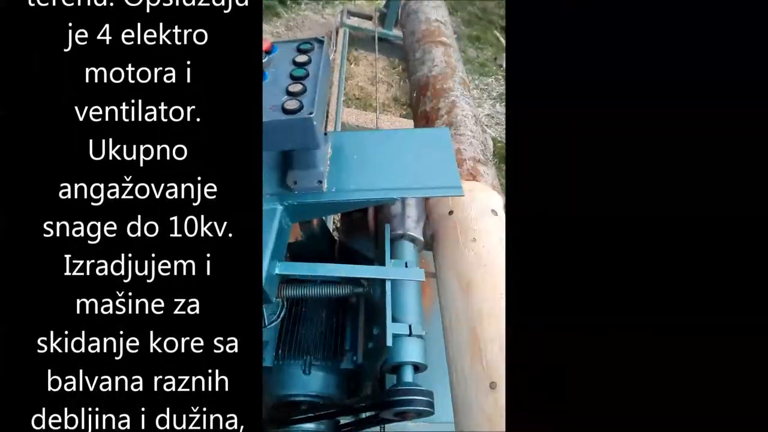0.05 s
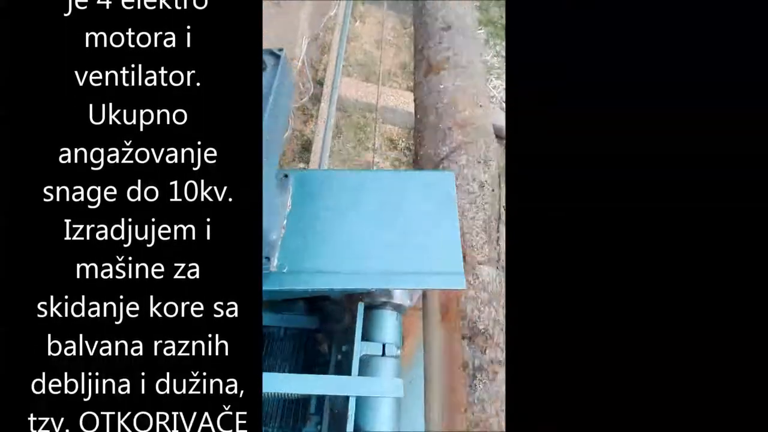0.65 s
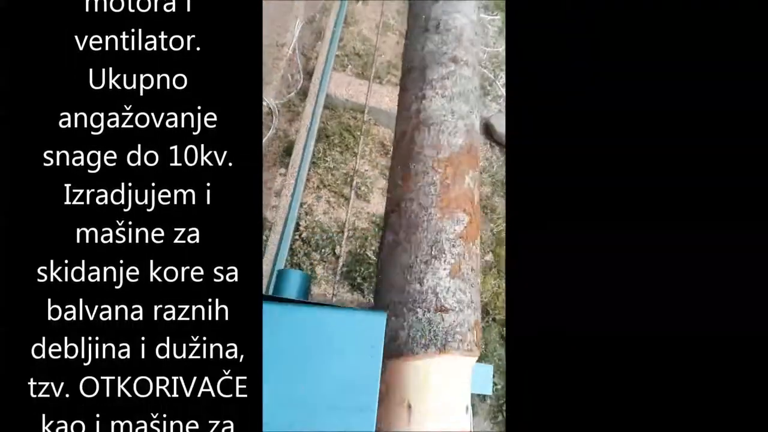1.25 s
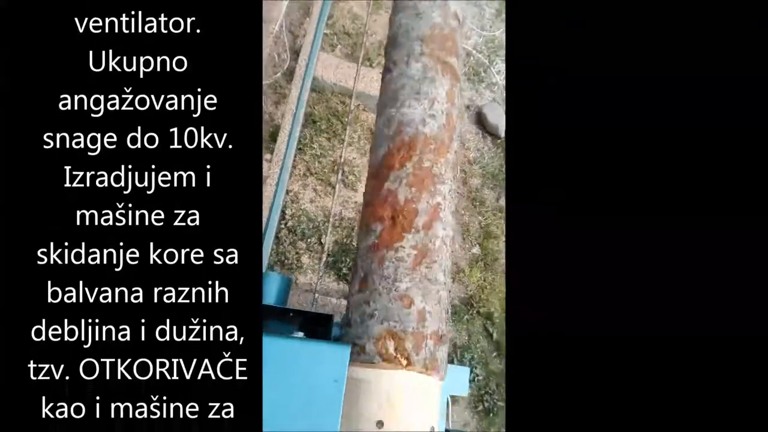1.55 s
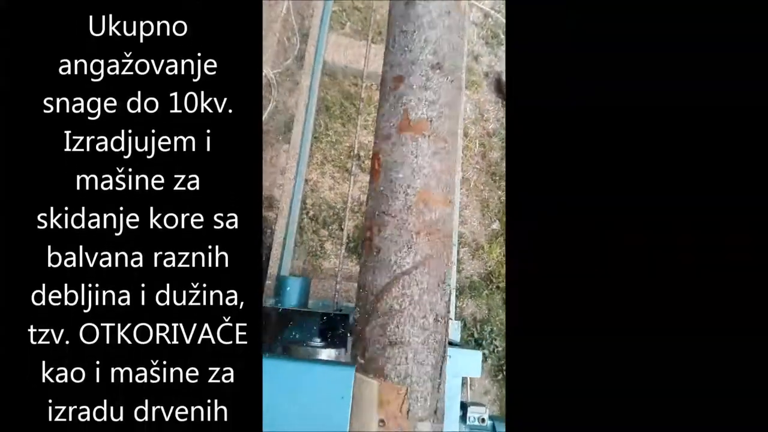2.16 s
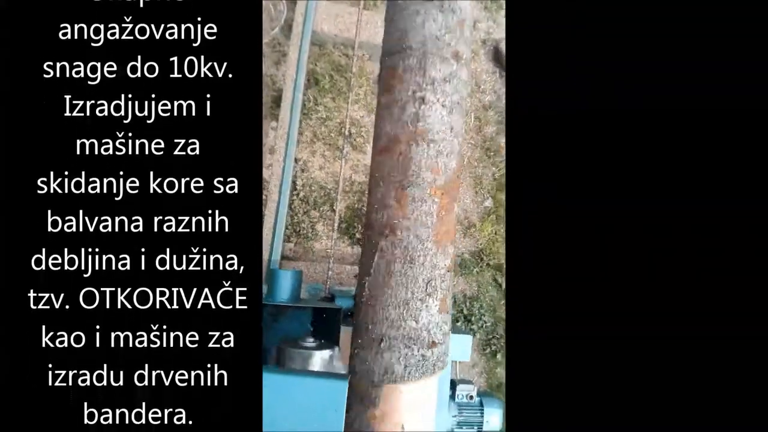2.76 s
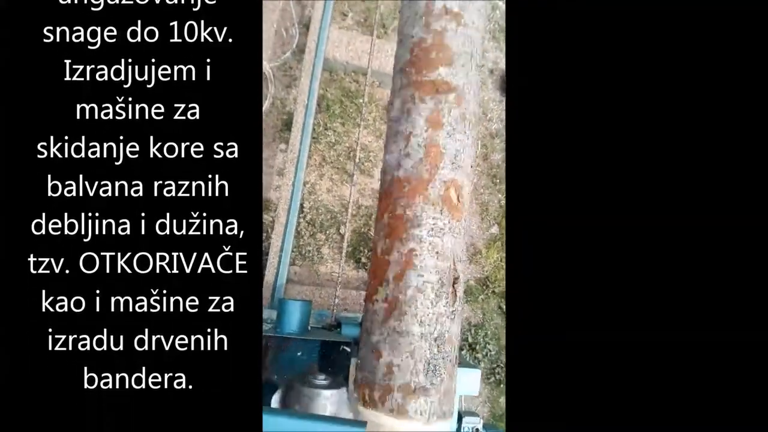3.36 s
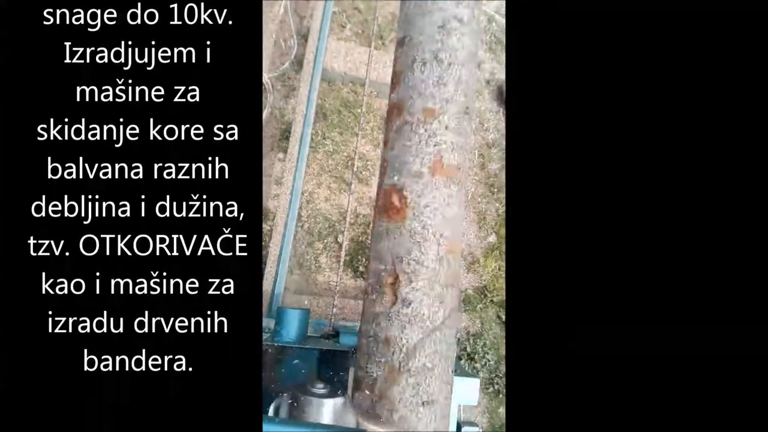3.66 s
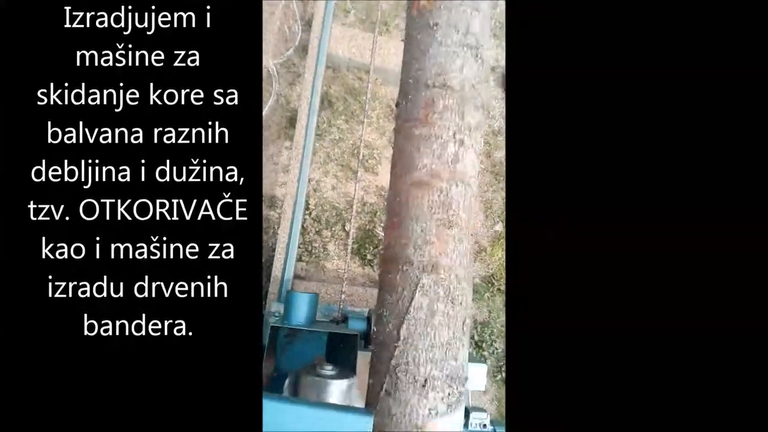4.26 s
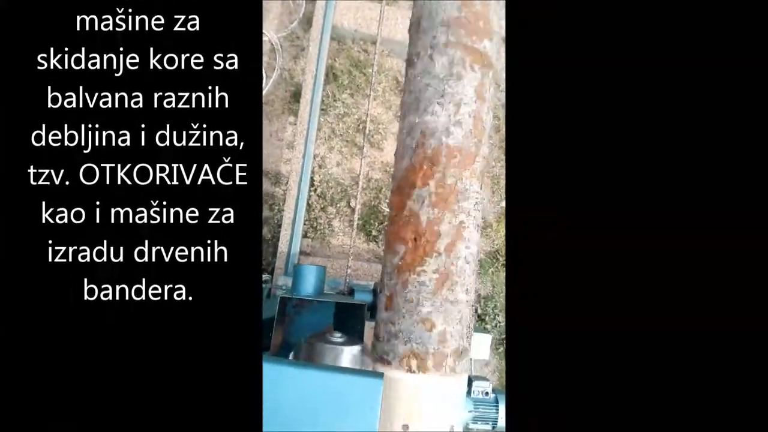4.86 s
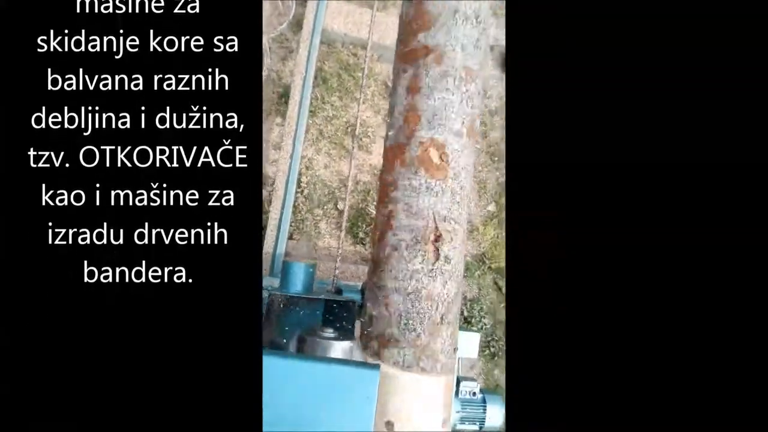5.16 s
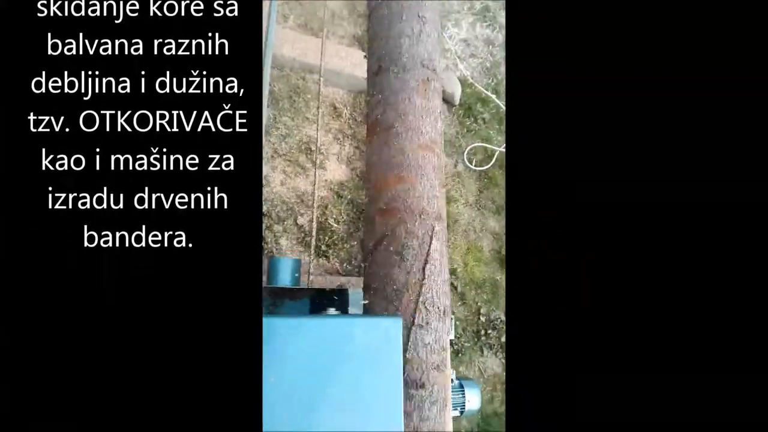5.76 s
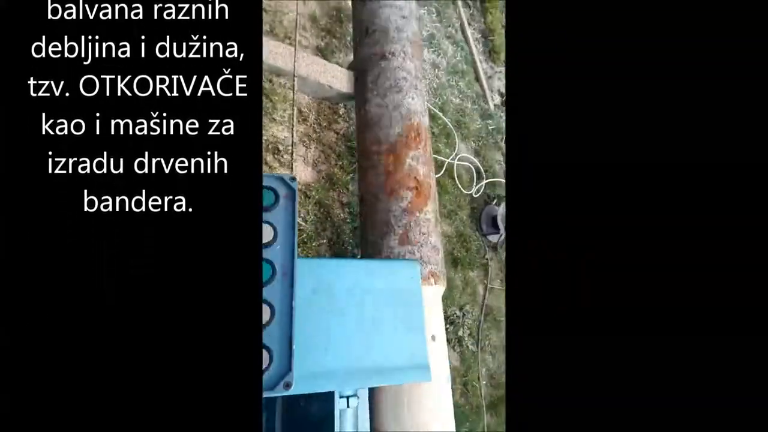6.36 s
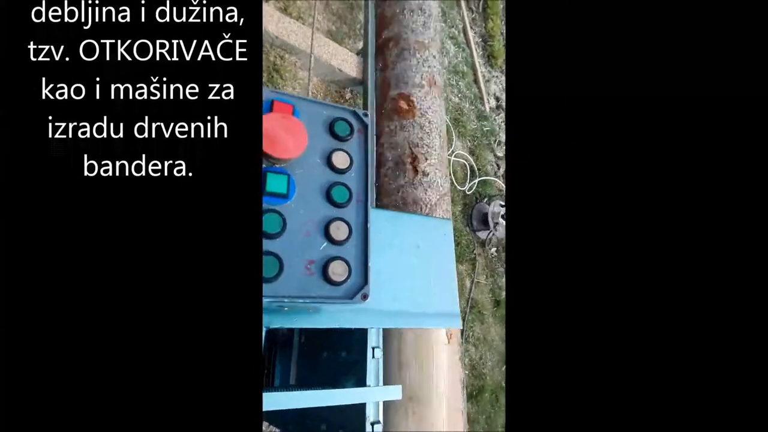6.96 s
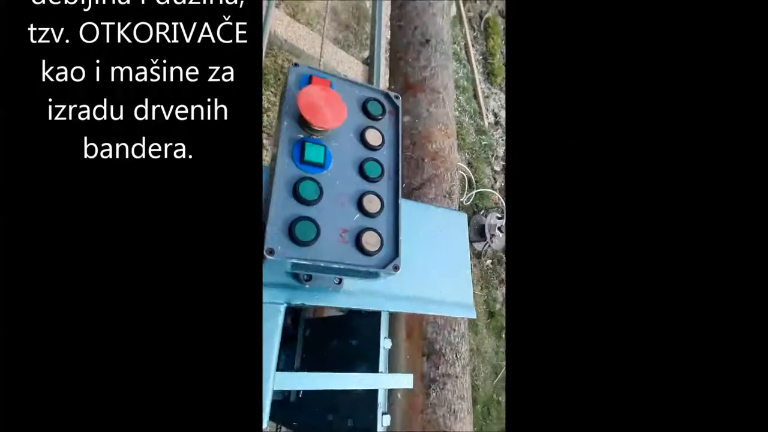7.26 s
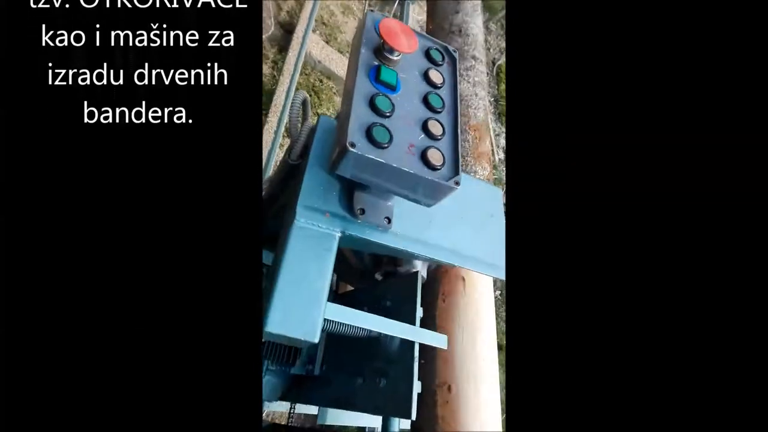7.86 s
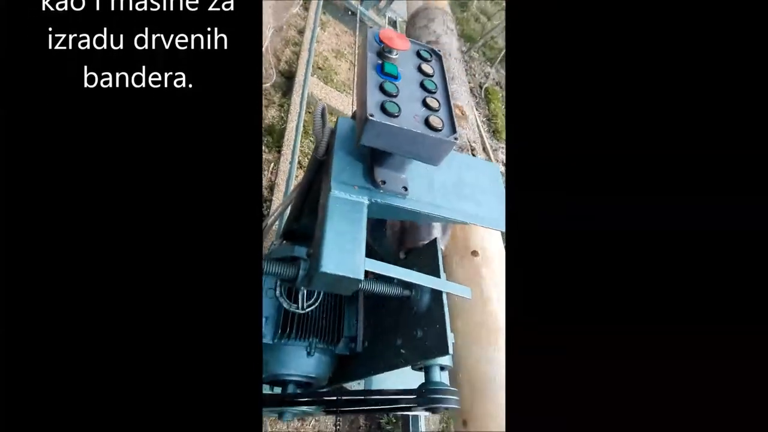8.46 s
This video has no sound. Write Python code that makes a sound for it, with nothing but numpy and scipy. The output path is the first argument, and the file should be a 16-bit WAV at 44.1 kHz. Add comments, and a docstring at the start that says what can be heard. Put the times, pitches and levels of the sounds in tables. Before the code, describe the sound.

Outdoors, about a pace away, an electric log peeler drones over a low rumble and fan hiss. Roughly every second and a half its knives bite the turning log: the motor sags slightly, the wood buzzes, bark rasps and chips spray, with metallic squeals and small chirps. Brief stuttering dips separate the bites. The cutting is brightest at first, then softens as the microphone moves around the machine.

```python
"""Log peeler at work

Outdoors, a pace away, the microphone wandering around the steel hood. A four-knife head on an electric
motor drones at about 375 Hz. Once per turn of the log the knives bite: the motor sags, the log buzzes,
bark rasps, chips spray, steel rings, the cut squeals and knots chirp. Between bites the head bounces
on the log and beats the air, over the rumble of the frame and the hiss of the fan."""
import sys
import numpy as np
from scipy import signal
from scipy.fft import rfft, irfft, next_fast_len
from scipy.io import wavfile
from scipy.ndimage import map_coordinates

SR = 44100
rng = np.random.default_rng(int(sys.argv[2]) if len(sys.argv) > 2 else 0)


def wav_record(signal):
    """Record a signal, one row per channel, as 16-bit PCM in the file named by sys.argv[1]."""
    frames = np.transpose(np.atleast_2d(signal))
    bounded = np.clip(frames, -1, 1)
    # unit amplitude maps onto the largest positive 16-bit level
    quanta = np.round(bounded * 32767).astype(np.int16)
    wavfile.write(sys.argv[1], SR, quanta)


N = 384111
KNIVES = 4
TURN_S, FIRST_TURN_S = 1.632, -0.19  # the log is out of round: one bite and one rest per turn

# Slow changes as the microphone moves. Each row: time in seconds, cutting gain in dB, spray gain in dB.
NEARNESS = [(0, 9, 12), (.31, 9.5, 11), (.42, 6, 9), (.85, 6, 2.5), (1.1, 0.5, -1.5), (2.2, 0.5, 1.5),
            (3.5, 1, 1.5), (5.1, -1.5, -0.5), (6.1, -5.5, -4.5), (6.8, -5, -8), (7.6, -6, -10.5),
            (8.1, -3.5, 0), (8.71, 0.5, -0.5)]


def amp(db):
    """Decibels to gain."""
    return 10 ** (np.asarray(db) / 20)


def unit(x):
    """Scale to rms 1."""
    return x / np.sqrt(np.mean(x ** 2) + 1e-20)


def noise():
    """White noise."""
    return rng.standard_normal(N)


def wobble(rate):
    """A smooth random curve through rate points a second."""
    grid = np.arange(0, N * rate / SR + 1, 1 / 8)
    smooth = map_coordinates(rng.standard_normal(int(grid[-1]) + 2), [grid])
    return np.interp(np.arange(N) * rate / SR, grid, smooth)


def curves(rows):
    """One value per sample for each column after the time."""
    times, *columns = np.transpose(rows)
    return [np.interp(np.arange(N) / SR, times, column) for column in columns]


def turn_time():
    """Seconds since the present turn of the log began."""
    return (np.arange(N) / SR - FIRST_TURN_S) % TURN_S


def each_turn(rows):
    """Like curves, but repeated with every turn of the log."""
    times, *columns = np.transpose(rows)
    return [np.interp(turn_time(), times, column, period=TURN_S) for column in columns]


def filtered(x, response):
    """Pass x through a response given as a function of frequency in Hz."""
    size = next_fast_len(N + 8192)
    return irfft(rfft(x, size) * response(np.fft.rfftfreq(size, 1 / SR)), size)[:N]


def coloured(x, spectrum):
    """Shape x, at rms 1. Each row of the spectrum: frequency in Hz, relative level in dB."""
    freqs, db = np.transpose(spectrum)
    return unit(filtered(x, lambda hz: amp(np.interp(np.log(hz + 1), np.log(freqs), db))))


def bite():
    """The knives sink in, ride the log, lift off and bounce: dB curves for buzz, rasp, spray and edges."""
    # Each row: seconds into the turn, then relative levels in dB of buzz, rasp, spray and edge ring.
    bite_levels = [(.03, -7.5, -20, -14, -22), (.065, -2.5, -11.5, -12.5, -6.5), (.2, -1.5, -5, -8, -4),
                   (.33, -0.5, -1, -7.5, -0.5), (.52, 0, -2, -1, -1.5), (.7, -1, -6.5, -1, -3),
                   (.9, 0, -7, -3.5, -5.5), (1.08, -1, -9.5, -4, -2), (1.245, -1, -17, -11, -7.5),
                   (1.285, -13, -25, -15.5, -31), (1.55, -10, -19, -16, -24)]
    # The head falls back on the log. Each row: seconds into the turn, relative level of buzz in dB.
    bounces = [(1.358, -6.5), (1.45, -21), (1.53, -10.5)]
    half_bounce_s = 0.016
    buzz_db, rasp_db, spray_db, edge_db = each_turn(bite_levels)
    near_db, near_spray_db = curves(NEARNESS)
    touch = sum(amp(db) * np.exp(-((turn_time() - s) / half_bounce_s) ** 2) for s, db in bounces)
    buzz_db = 20 * np.log10(amp(buzz_db) + touch)
    edge_db = 20 * np.log10(amp(edge_db) + amp(-1) * touch)
    return buzz_db, rasp_db + near_db - 30.5, spray_db + near_spray_db - 33.5, edge_db + near_db - 34


def cutter_head(passes, press_db, sag_hz):
    """The knives beat the air in a near sine, louder against the log; their blows add the overtones."""
    # Harmonics 1, 2 and 4. Each row: time in seconds, relative level in dB.
    drone_levels = [(0, -18.5), (.45, -16.5), (.7, -14), (.89, -12), (.96, -14.5), (1.6, -13.5),
                    (1.9, -16.5), (3.7, -17.5), (4.4, -20.5), (6, -18.5), (7.5, -21), (8.71, -27.5)]
    second_levels = [(0, -31.5), (.6, -39), (.9, -26), (1.65, -28), (1.9, -41.5), (2.15, -32), (2.55, -50),
                     (3.3, -41), (3.6, -28), (4.3, -42), (5, -42.5), (5.3, -33.5), (6.5, -39), (6.8, -34),
                     (8.71, -31)]
    fourth_levels = [(0, -31), (.7, -26), (.95, -36), (1.6, -25.5), (2.1, -37.5), (3.8, -26.5),
                     (4.5, -30.5), (6.8, -30.5), (7.6, -31), (8, -46), (8.71, -33.5)]
    # Each row: time in seconds, relative level of harmonic 3 in dB, upper harmonics against it in dB.
    buzz_levels = [(0, -19, -9), (.7, -24.5, -10.5), (1.4, -20.5, -12), (2, -25, -8.5), (3.6, -23.5, -8.5),
                   (5.8, -26.5, -10), (6.55, -29.5, -9.5), (7.2, -26.5, -15), (8.71, -23.5, -23)]
    # Each row: harmonic number, offset in dB, extra dB over the log, extra dB per Hz of motor sag.
    upper_harmonics = [(5, 4.5, -3, -0.42), (6, 0, -10, -.5), (7, -6.5, 5.5, 0.33)]
    # The microphone swings out and back. Each row: time in seconds, 0 by the motor to 1 over the log.
    microphone_path = [(.8, 0.67), (2, 0.0041), (3.3, 1), (5.2, 0.94), (6.8, 0.59), (7.5, 0.51), (8.1, 0)]
    angle = 2 * np.pi * passes
    drone = amp(curves(drone_levels)[0] + 0.34 * press_db + 0.49 * wobble(30)) * np.sin(angle)
    graze = np.clip((-4 - press_db) / 8, 0, 1)  # grazing knives sound duller and flutter more
    chatter_db = (0.7 + 2.0 * graze) * wobble(45)
    third_db, upper_db = curves(buzz_levels)
    position = curves(microphone_path)[0]
    overtones = [(2, curves(second_levels)[0]), (3, third_db), (4, curves(fourth_levels)[0])]
    for k, db, over_log_db, db_per_hz in upper_harmonics:
        overtones.append((k, third_db + upper_db + db + over_log_db * position + db_per_hz * sag_hz))
    buzz = np.zeros(N)
    for k, db in overtones:
        slip = 0.055 * k * wobble(60)  # the wood gives a little under each blow
        level_db = db + press_db + chatter_db + 0.27 * k * wobble(25) - abs(k - 3) * graze
        buzz += amp(level_db) * np.sin(k * angle + slip)
    return np.sqrt(2) * (drone + buzz)


def frame_and_fan():
    """Frame and belts rumble, air rushes through the hood, and the fan hisses."""
    # Each row: time in seconds, relative levels in dB of the rumble and of the rush.
    air_levels = [(0, -34, -35.5), (.8, -32.5, -36.5), (1.55, -31.5, -38.5), (2, -36.5, -40.5),
                  (4.5, -39.5, -43), (7.9, -38.5, -43), (8.71, -44, -44.5)]
    # Colours of frame, hood air and fan. Each row: frequency in Hz, relative level in dB.
    rumble_spectrum = [(15, -14), (40, -18), (110, -5.5), (170, -8), (238, 1.5), (295, -4), (340, -0.5),
                       (420, -5), (700, -13), (2000, -64)]
    rush_spectrum = [(200, -42), (340, 4), (440, 4), (520, 1.5), (610, -5.5), (750, -7), (980, 0),
                     (1280, -0.5), (1700, -5.5), (2300, -10.5), (3200, -14), (4800, -20.5), (14000, -39)]
    hiss_spectrum = [(2000, -13), (3500, -3.5), (4700, -5), (5600, 0.5), (6500, 0.5), (8000, -8.5),
                     (10000, -18.5), (14000, -20)]
    rumble_db, rush_db = curves(air_levels)
    rumble = amp(rumble_db + 3.0 + 0.72 * wobble(12)) * coloured(noise(), rumble_spectrum)
    rush = amp(rush_db + 10 + 0.8 * wobble(20)) * coloured(noise(), rush_spectrum)
    hiss = amp(-41.5 + 0.94 * curves(NEARNESS)[0]) * coloured(noise(), hiss_spectrum)
    return rumble + rush + hiss


def scrape(passes, memory_turns, size=480):
    """Each knife scrapes much as it did a shaft turn ago; the pattern renews over memory_turns."""
    turns = passes / KNIVES
    pattern = rng.standard_normal((int(turns[-1] / memory_turns) + 3, size))
    place = [turns / memory_turns, turns % 1 * size]
    return unit(map_coordinates(pattern, place, order=1, mode="grid-wrap"))


def contact(passes, depth_db, uneven_db):
    """Gain that peaks as each knife strikes; one side of the head cuts deeper."""
    strike = ((1 + np.cos(2 * np.pi * passes)) / 2) ** 2
    return amp(depth_db * strike + uneven_db * np.cos(2 * np.pi * passes / KNIVES))


def crackle(rate, spread_db):
    """Breaking fibres: random clicks of uneven size, rate a second."""
    clicks = (rng.random(N) < rate / SR) * noise()
    return unit(clicks * amp(spread_db * np.clip(noise(), -2, 2)))


def bark(passes, rasp_db, spray_db):
    """The knives rasp through the bark in step with the shaft, and every cut throws chips."""
    # Colours of torn bark and flying chips. Each row: frequency in Hz, relative level in dB.
    rasp_spectrum = [(900, -5.5), (1900, -1), (2300, 0.5), (2600, 3.5), (2950, -3), (3500, 7), (4050, -5.5),
                     (4550, 2.5), (5000, -12), (5600, 1.5), (6100, -4), (6800, -3), (8000, -9),
                     (14000, -15)]
    spray_spectrum = [(1500, -2.5), (4000, 2.5), (5000, 6.5), (6700, 8), (8000, 4), (10000, -1),
                      (12000, 0.5), (14300, -9)]
    fibres = scrape(passes, memory_turns=18) + .55 * noise()
    rasp = coloured(fibres * contact(passes, depth_db=7.5, uneven_db=1.0), rasp_spectrum)
    chips = crackle(rate=14000, spread_db=2) + .55 * scrape(passes, memory_turns=7)
    chips *= contact(passes, depth_db=4, uneven_db=-1.0)
    spray = coloured(chips * amp(2.5 * wobble(250)), spray_spectrum)
    return amp(rasp_db + 2.0 * wobble(30)) * rasp + amp(spray_db + 1.3 * wobble(30)) * spray


def strokes(cycles, jitter_s, spread_db):
    """One sharp pulse per whole cycle, each a little early or late and of its own size."""
    index = np.round(cycles).astype(int)
    late, size = rng.standard_normal((index[-1] + 1, 2))[index].T
    gap_s = (cycles - index) / np.gradient(cycles) / SR - jitter_s * late
    return amp(spread_db * size) * np.exp(-(gap_s / 3e-5) ** 2)


def hood_echo(x, delay_s, drift_s, share):
    """The hood returns each click after a delay that shifts as the contact point moves."""
    n = np.arange(N)
    lag = (delay_s + drift_s * wobble(9)) * SR
    return x + share * np.interp(n - lag, n, x)


def dispersed(x, delay_s):
    """Bending waves carry treble first, smearing clicks into chirps; 1 kHz trails 4 kHz by delay_s."""
    return filtered(x, lambda hz: np.exp(-2j * np.pi * delay_s * (2 * np.sqrt(4000 * hz) - hz)))


def knife_edges(passes, edge_db):
    """Steel meets firm wood: evenly spaced clicks make a bright, metallic buzz."""
    # Ring of the edges. Each row: frequency in Hz, relative level in dB.
    steel_spectrum = [(2400, -28), (2950, -0.5), (3400, 1.5), (3800, -0.5), (4500, 2.5), (4900, -7.5),
                      (5900, -2), (7100, -8.5), (7700, -9), (9500, -17), (11000, -28), (14000, -11)]
    clicks = strokes(passes + .005 * wobble(35), jitter_s=1.1e-5, spread_db=1.5)
    clicks = hood_echo(clicks, delay_s=.0011, drift_s=6e-5, share=.45)
    chirps = dispersed(clicks, delay_s=.0024)
    return amp(edge_db + 1.75 * wobble(32)) * coloured(chirps, steel_spectrum)


def squeals(passes):
    """The deepest knife rings the cut once a shaft turn, at pitches that differ from bite to bite."""
    # Each row, one per bite: frequency in Hz and level in dB of the low, middle and high resonance.
    resonances = [(3210, -32, 3560, -27.5, 5370, -34), (2616, -35, 3500, -39, 4300, -51),
                  (2630, -35, 3450, -36, 4250, -45), (2600, -36.5, 3600, -36.5, 4300, -37),
                  (2920, -38, 3250, -38.5, 4200, -46), (3155, -41, 3730, -35.5, 4600, -45)]
    # Each row, low to high resonance: start and end in seconds into the turn, rough width in Hz.
    shapes = [(0.254, 0.58, 236), (0.275, 0.776, 287), (0.276, 0.796, 416)]
    blows = strokes(passes / KNIVES, jitter_s=2e-5, spread_db=1.3)
    blows = hood_echo(blows, delay_s=.0021, drift_s=5e-5, share=.3)
    blows = dispersed(blows, delay_s=.02)
    sound = np.zeros(N)
    for turn, row in enumerate(resonances):
        turn_s = FIRST_TURN_S + turn * TURN_S
        for (hz, db), (start, end, width) in zip(np.reshape(row, (-1, 2)), shapes):
            n = np.arange(int((turn_s + start) * SR), min(N, int((turn_s + end) * SR)))
            b, a = signal.iirpeak(hz, hz / (1.5 * width), SR)
            ring = signal.lfilter(b, a, signal.lfilter(b, a, blows[n]))
            swell = np.sqrt(np.abs(np.sin(np.pi * (n / SR - turn_s - start) / (end - start))))
            sound[n] += amp(db) * swell * unit(ring)
    return sound


def knots(passes, spray_db):
    """Knots sharpen the knife strokes for a moment; smaller hard spots come at random while chips fly."""
    # Knots come round with every turn. Each row: seconds into the turn, relative level in dB,
    # sizzle against it in dB, time scale in seconds, turn in which the knot is cut deepest.
    knot_catches = [(0.291, -28, -7.5, .035, 2.3), (0.497, -30.5, -4.5, 0.023, .4),
                    (.68, -39, -11, .024, 2), (0.774, -38, -2, 0.043, -2), (1.038, -31.5, -17, 0.02, 1.5),
                    (1.111, -34, -26, 0.016, 3.7), (1.195, -35.5, -6, .03, 3.5)]
    # Colours of the chirps and of their top sizzle. Each row: frequency in Hz, relative level in dB.
    tear_spectrum = [(2000, -26), (3500, 2), (5500, -1), (6800, 6), (8000, -8), (10000, -25), (14000, -29)]
    sizzle_spectrum = [(5000, -29), (8000, -7), (10000, 0), (12000, -3), (14000, 6)]
    fade_db = 0.8  # per turn away from the deepest cut
    near = amp(curves(NEARNESS)[0])
    tear_gain = amp(spray_db - 9.0 + 3.4 * wobble(35))
    sizzle_gain = amp(spray_db - 8.5 + 2.4 * wobble(45))
    turn = (np.arange(N) / SR - FIRST_TURN_S) // TURN_S
    for start, db, sizzle_db, scale_s, deepest in knot_catches:
        age = np.clip((turn_time() - start) / scale_s, 0, 5)
        depth = amp(-fade_db * abs(turn - deepest))
        burst = near * depth * 2 * age * np.exp(1 - 2 * age - age ** 2 / 2)
        tear_gain += amp(db) * burst
        sizzle_gain += amp(db + sizzle_db) * burst
    clicks = strokes(passes + .006 * wobble(45), jitter_s=1e-5, spread_db=1.6)
    clicks = hood_echo(clicks, delay_s=0.0006, drift_s=5e-5, share=0.79)
    chirps = dispersed(clicks, delay_s=.003)
    return tear_gain * coloured(chirps, tear_spectrum) + sizzle_gain * coloured(chirps, sizzle_spectrum)


def scene():
    """One shaft and one turning log drive the cutting; both channels carry the same sound."""
    # The motor sags under the bite and recovers. Each row: seconds into the turn, knife rate in Hz.
    motor_speed = [(0, 380), (.17, 379.5), (.3, 377.6), (.5, 373), (.62, 371.7), (.72, 371.8), (.85, 373.7),
                   (1.13, 377.7), (1.33, 378.3), (1.47, 379.2)]
    # The log runs thicker or thinner from turn to turn. Each row: time in seconds, rate shift in Hz.
    speed_drift = [(.4, 0.31), (2.1, -.17), (3.7, -.05), (5.3, .1), (7, -0.199), (8.4, 0.13)]
    knife_hz = each_turn(motor_speed)[0] + curves(speed_drift)[0]
    passes = np.cumsum(knife_hz + 0.162 * wobble(15)) / SR  # running count of knife passes
    press_db, rasp_db, spray_db, edge_db = bite()
    cutting = knife_edges(passes, edge_db) + squeals(passes)
    cutting += bark(passes, rasp_db, spray_db) + knots(passes, spray_db)
    mono = cutter_head(passes, press_db, sag_hz=knife_hz.max() - knife_hz) + cutting + frame_and_fan()
    return np.array([mono, mono])


def record(dry, top_hz=14300):
    """The recorder keeps nothing above its band limit."""
    return np.array([filtered(channel, lambda hz: hz < top_hz) for channel in dry])


dry = scene()
out = record(dry)
wav_record(out)
```